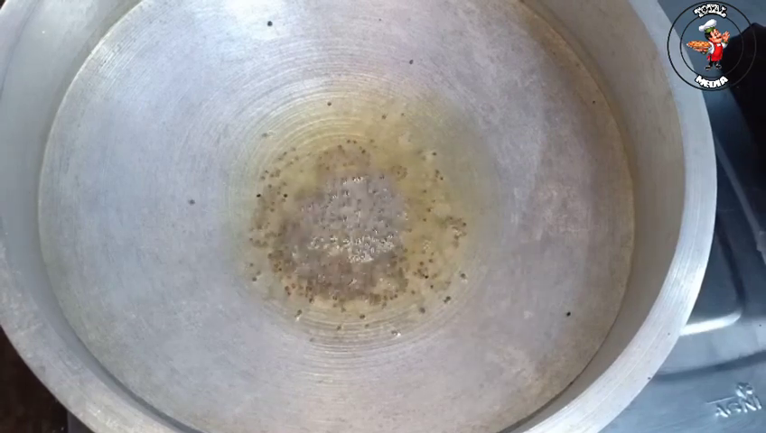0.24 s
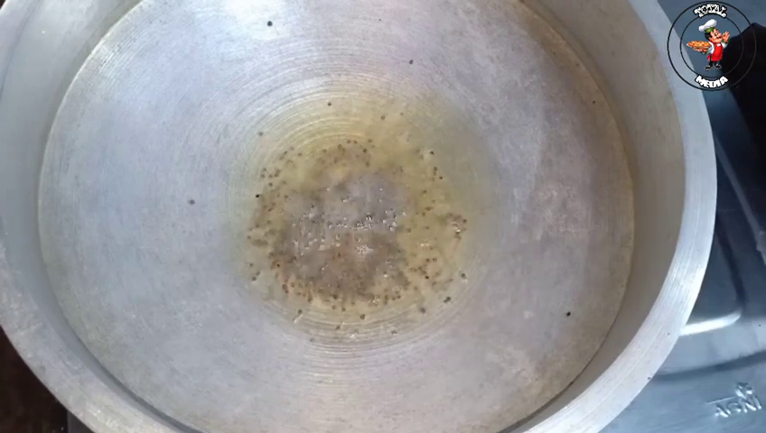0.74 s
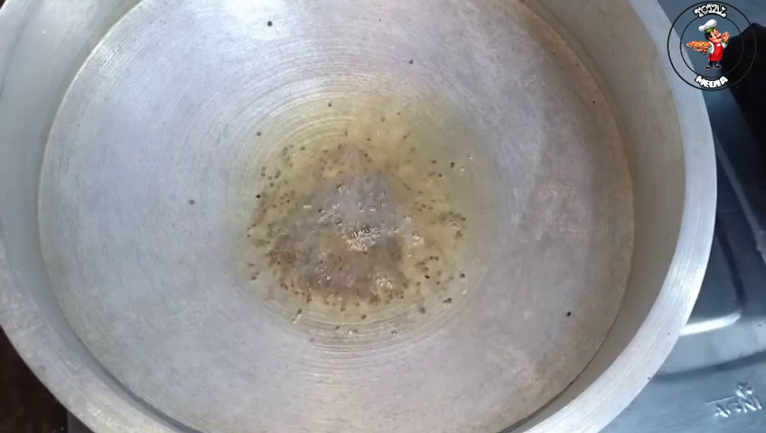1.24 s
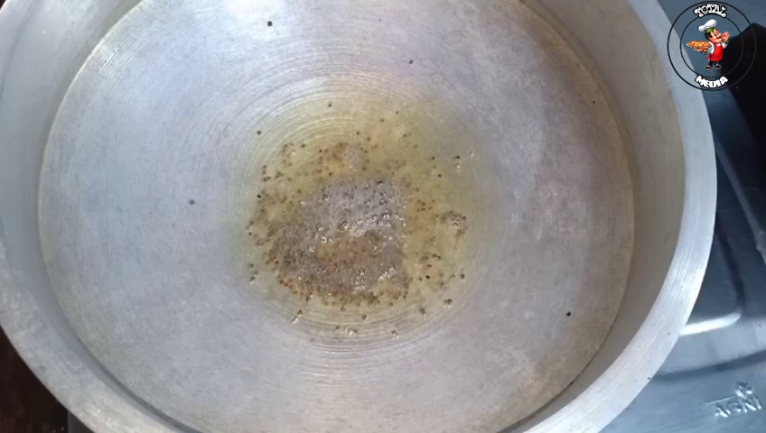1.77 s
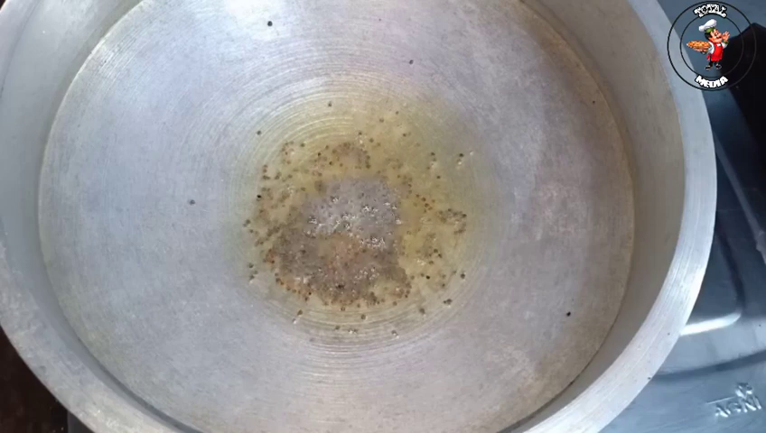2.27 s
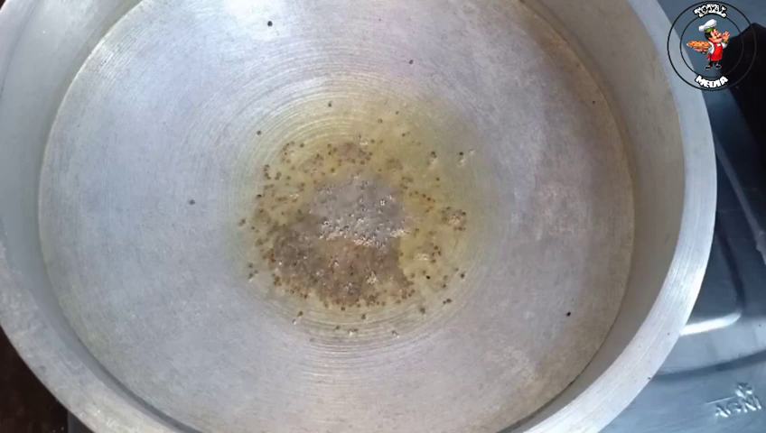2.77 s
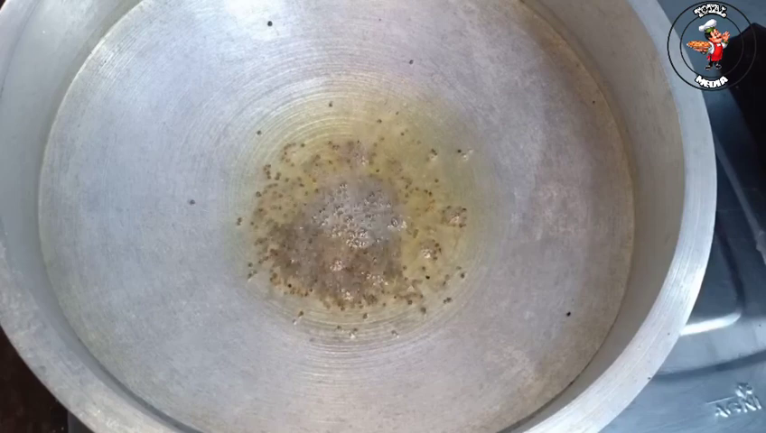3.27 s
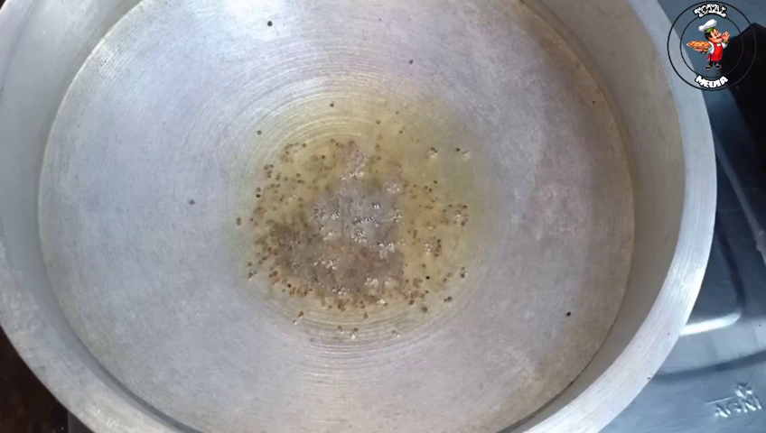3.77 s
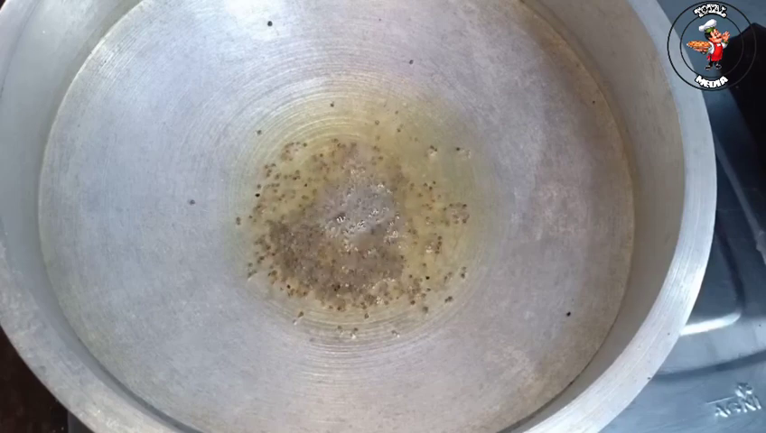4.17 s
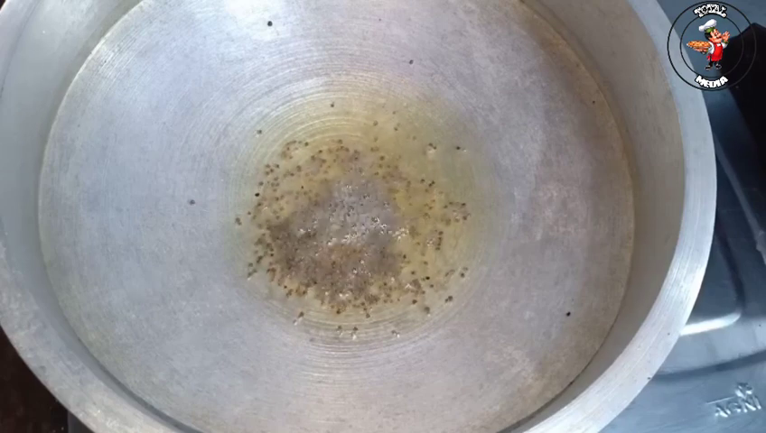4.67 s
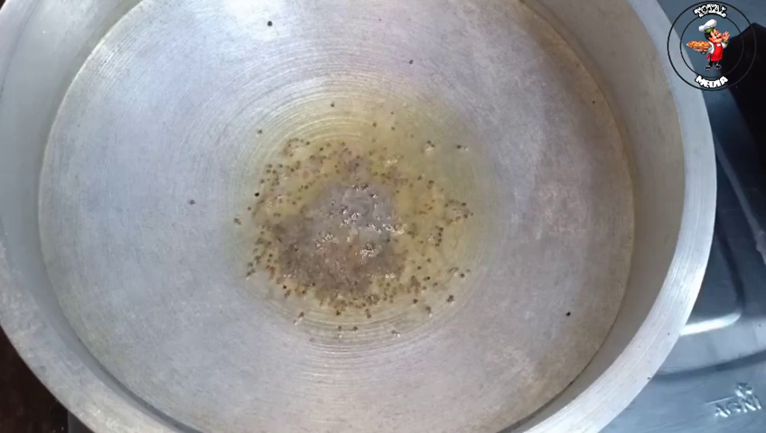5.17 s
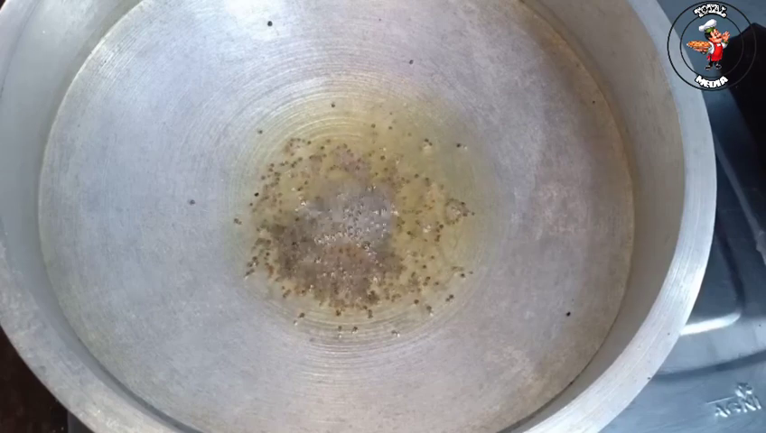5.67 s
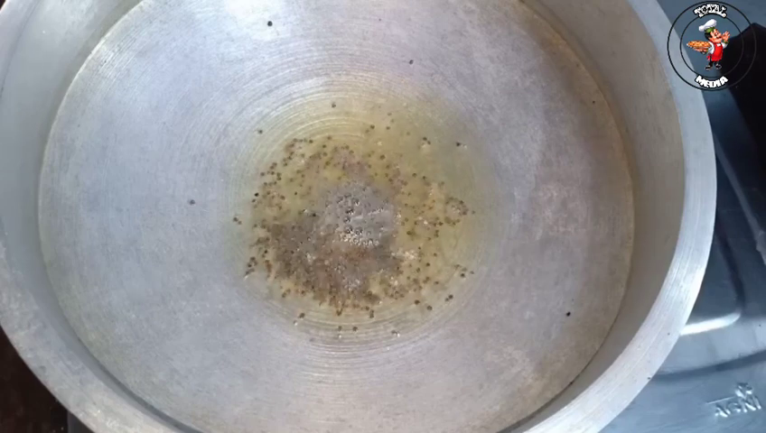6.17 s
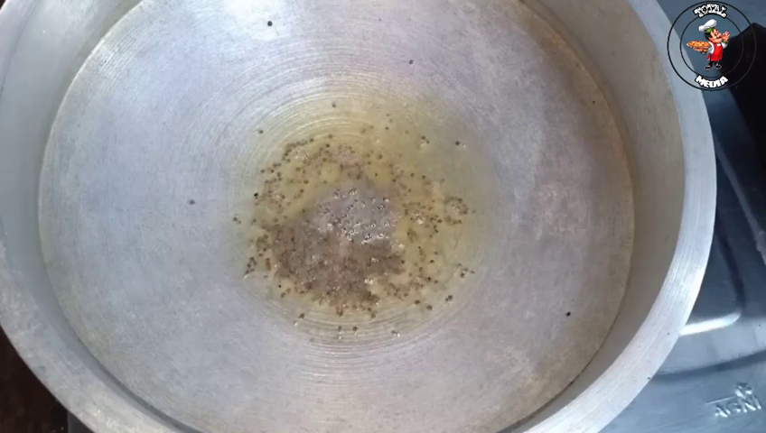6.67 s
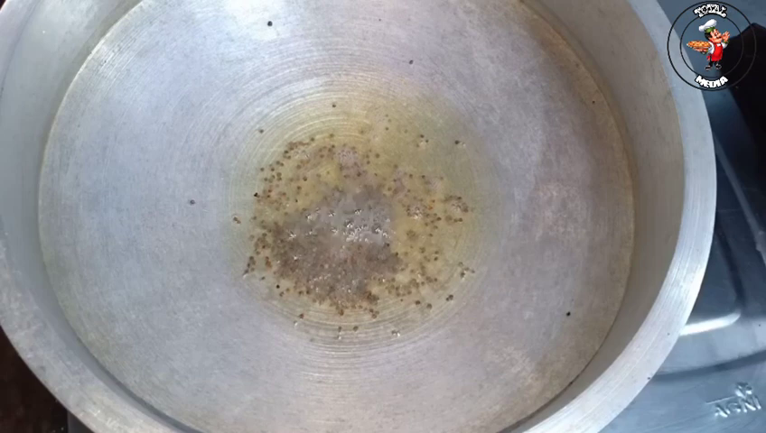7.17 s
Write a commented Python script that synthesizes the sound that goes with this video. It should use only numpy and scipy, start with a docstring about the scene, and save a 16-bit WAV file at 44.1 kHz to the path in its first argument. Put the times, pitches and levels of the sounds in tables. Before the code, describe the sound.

From the very start, seeds burst rapidly in hot oil in a deep heavy metal pan, close under a stereo microphone. Each burst is a very short, pitched, hollow pop with a bright crack, reflecting off the walls and ringing the metal briefly; the strongest flatten and distort. Droplets splutter in clusters after pops, above a thin fine sizzle. The first 1.9 s are densest, with a low puff of air mainly left at 0.9 s and bright steam spits near 0.9 and 1.5 s. A short gap follows around 2.0 s. Dull knocks cluster at 2.5-2.7 s, with fainter ones at 4.05-4.15 s. Popping is busy again around 3.0-3.8 s, then looser, with isolated loud pops and short hisses until 7.0 s; only weak pops remain to 7.4 s. A quiet low room rush and wavering hum continue underneath; one low drone fades by 3.8 s, another swells near 5.6 s and eases.

```python
"""Seeds bursting in hot oil

Small seeds burst one after another in a deep, heavy metal pan, close under a stereo microphone.
Each burst is a short pitched pop with a crack; it bounces off the walls, rings the pan, and the loudest overload.
Droplets splutter in their wake, bubbles sizzle and some jets of steam hiss; there are dull knocks and one air puff.
Behind lie a low room rush, a faint wavering hum and two drones, one dying away and one swelling then easing."""
import sys
import numpy as np
from scipy import signal
from scipy.fft import rfft, irfft
from scipy.io import wavfile

SR = 44100
rng = np.random.default_rng(int(sys.argv[2]) if len(sys.argv) > 2 else 0)


def transcribe(u):
    """Save the signal u as a 16-bit wav file named by the first command-line argument.

    u: samples, shape (n,) or (channels, n), limited to [-1, 1]; the rate is SR.
    q: integer samples, one column per channel.
    """
    v = np.clip(np.atleast_2d(u).T, -1, 1)
    q = np.round(v * 32767).astype(np.int16)
    wavfile.write(sys.argv[1], SR, q)


N = 327663

# bursting seeds, one a row: start_s, pop_db, pitch_hz, crack_db (strengths before colour and pan)
SEED_BURSTS = [(0.0085, 33.5, 2390, 13), (0.0235, 19, 2500, -2.0), (0.0557, 19, 2000.0, 2),
               (0.1192, 23, 2410, 10.5), (0.1427, 37.5, 2355, 6), (0.1909, 25, 1450, 18.5),
               (0.2177, 27.5, 2200, 17.5), (0.2635, 21.5, 4460, 11), (0.2799, 21.5, 2100, -9),
               (0.3117, 8, 2800.0, 17.0), (0.3253, 30.5, 2310, 9), (0.3577, 17.5, 2930.0, 9),
               (0.3792, 26.5, 1920, -13), (0.4521, 27.5, 2280.0, 2), (0.487, 20, 2670.0, 7.5),
               (0.5262, 18, 5400, 13.5), (0.5752, 22.5, 2680.0, -8.0), (0.5968, 34.5, 2340, 19),
               (0.6632, 22, 1430, 8.0), (0.6907, 31.0, 2190, 14.5), (0.7883, 22.5, 2480, 7.5),
               (0.8207, 21, 2050, 3), (0.8995, 21.5, 2350, -10), (0.9091, 16, 6100, 15.0),
               (0.9215, 20.5, 1910.0, -5), (0.985, 21.5, 2010, 12.5), (1.004, 9, 2400.0, 6),
               (1.032, 35, 2280.0, 13.5), (1.0611, 28.5, 2200, 20), (1.0994, 37, 2290, 11.5),
               (1.1289, 11, 1740.0, 10.0), (1.2096, 29, 2460, 7.5), (1.2593, 25, 1850.0, 7.5),
               (1.3008, 1, 3240.0, 11), (1.32, 23, 1700, -8.0), (1.3606, 20.5, 1890, -11),
               (1.365, 29, 2130, -7.0), (1.4622, 23.5, 1730, 2), (1.4749, 20.5, 7800, 12.0),
               (1.5396, 27, 3240, 2), (1.5615, 25.5, 1780, 9.5), (1.6109, 35, 2320, 11.0),
               (1.6252, 19.5, 5270, 14.0), (1.658, 16.0, 4400, 12.5), (1.7364, 27, 1700.0, 5),
               (1.7614, 29, 2400, 15.0), (1.7907, 35.5, 2340, 13.5), (1.8673, 25, 2090, 7),
               (1.9467, 19, 2030, 6), (2.1835, 23, 2380, -1), (2.2064, 27.5, 2270.0, 10),
               (2.2442, 26.5, 2020, -14), (2.2946, 27.5, 2010.0, 7), (2.3119, 28.0, 2450, 9),
               (2.4656, 24.5, 3130.0, 15.5), (2.5359, 28.5, 5760, 18), (2.6078, 22, 1840, 14.5),
               (2.6299, 36, 2290, 10), (2.685, 27.5, 2200, 18.5), (2.782, 26.0, 1870, -1.0),
               (2.7883, 33.5, 2220, 12.5), (2.8386, 26, 1910.0, 8), (2.9027, 17.5, 2280, -2.5),
               (2.9726, 15, 2240.0, 6), (2.9983, 29.5, 2450, 16.5), (3.024, 39.5, 2290, 12),
               (3.05, 22, 2500.0, 4), (3.0632, 20, 1870.0, 5), (3.0851, 24, 2180, 17.5),
               (3.116, 20.5, 7460, 11), (3.1369, 13.5, 7560.0, 8), (3.2544, 16.5, 1820, 2.5),
               (3.2876, 22, 2510, 9), (3.3968, 21, 1550, 3.0), (3.404, 29, 1940, 12),
               (3.419, 18.5, 3200.0, 8), (3.4505, 21.5, 1750, 4), (3.4931, 32.5, 2300, 15.5),
               (3.5308, 32.5, 2200, 8), (3.553, 21.5, 2000.0, -3), (3.5954, 26.5, 1810, 13),
               (3.7436, 32.5, 2240, 16.5), (3.7604, 36, 2440, 17), (3.8902, 20, 1650, 9.5),
               (3.9781, 23, 2520, -1), (3.998, 17, 1680, -5.0), (4.0312, 33.5, 1920, 13),
               (4.1002, 3, 4510.0, 11.5), (4.228, 28, 2160, 16.5), (4.2726, 18, 1980, 0.0),
               (4.3122, 32.5, 2390.0, 9), (4.4265, 19, 2240, 14), (4.5213, 37, 2190, 3),
               (4.5463, 26, 1950, 16.5), (4.6283, 21.0, 4180.0, 19.0), (4.6902, 20.5, 2050, 5),
               (4.709, 21.5, 2500, 8), (4.7237, 16.5, 2020, 8.5), (4.7309, 27, 2120, 3),
               (4.9389, 17, 5200, -12), (4.9856, 24, 2040, -1.0), (5.0201, 31.5, 2220, 6.0),
               (5.1238, 16, 1750, 16.5), (5.1377, 31, 2010, -4), (5.2037, 22.5, 2480, 6.5),
               (5.2275, 24.5, 2060, 8.0), (5.3158, 21.5, 2140, 5.5), (5.3435, 6, 7640.0, 5.5),
               (5.4167, 23, 1800.0, -11), (5.4497, 16.0, 1920, -13), (5.5821, 28.5, 2060, 7.5),
               (5.6586, 37.5, 2390, 20.5), (5.6831, 28, 2660, -5), (5.7228, 25.5, 1790.0, 10.5),
               (5.7485, 24, 2130, 7), (5.865, 26, 2900, 5), (6.0081, 32.5, 2250.0, -1.0),
               (6.0701, 19, 3840.0, 9), (6.0805, 22, 3200, 14), (6.0929, 29, 1570, 4),
               (6.1428, 25.5, 2180, 0), (6.2181, 17.5, 2800, 9), (6.363, 34.5, 2200.0, 1.0),
               (6.3889, 25.5, 1600, 6), (6.4309, 24.5, 2140, 9), (6.4652, 18, 1800, 1),
               (6.5844, 30.5, 2330.0, 8.5), (6.6989, 23, 2680, 11.0), (6.765, 25.0, 2180.0, 5.5),
               (6.8387, 33.5, 2280.0, 17.0), (6.9541, 36.0, 2180, 14.0), (7.1635, 15, 6000, 4),
               (7.2371, 15.5, 3010.0, 7.5), (7.3305, 12.5, 5140, 13), (7.3683, 18.5, 1720.0, 2.0),
               (7.4126, 3, 3840, -1.0)]
# relative colour of a burst as it leaves the pan: frequency_hz, gain_db
BURST_COLOUR = [(40, -21), (200, -19.5), (500, -9), (850, -4.5), (1150, -8), (1600, -2), (2300, -4.5),
                (3100, 1.5), (3500, -6), (4100, -3.5), (5200, 3.5), (6100, -0.5), (7100, -11.5),
                (9000, -19.5), (15000, -24)]
EDGE_HZ = 15900  # upper band limit


def seeds(level_db=-2, size=16384, spot_count=36):
    """A husk splits with a broadband crack, and the escaping steam rings for a few cycles."""
    hz, out = bins(size), np.zeros((2, N))
    colour = causal(amp(read(BURST_COLOUR, hz) + level_db))
    # the bursts take turns over a limited set of spots in the oil
    spots = [pan_path() * tear() * colour for _ in range(spot_count)]
    for k, (start_s, pop_db, pitch_hz, crack_db) in enumerate(SEED_BURSTS):
        spectrum = burst(hz, pop_db, pitch_hz, crack_db) * spots[k % spot_count]
        add(out, start_s, irfft(spectrum))
    return out


def burst(hz, pop_db, pitch_hz, crack_db):
    """Spectrum of one seed: a flat crack and a steam resonance, sharper when strong or in tune with the pan's air."""
    cavity_hz, cavity_q, cavity_boost = 2280, 8.6, 2.48  # boost: extra Q, in times, for a pop in tune
    base_q, ordinary_db, q_db_per_db = 2.9, 27.5, 0.09
    in_tune = abs(bell(pitch_hz, cavity_hz, cavity_q)) ** 2
    strength_factor = amp(q_db_per_db * (pop_db - ordinary_db))
    q = base_q * strength_factor * (1 + cavity_boost * in_tune)
    pop = amp(pop_db) * abs(bell(hz, pitch_hz, q))
    return causal(np.hypot(pop, amp(crack_db)))


def tear(tear_s=0.0011, first=3.2, depth=0.74, size=16384):
    """Spectrum of a husk giving way: a first snap and a quick run of smaller ones, with no strong colour."""
    t = np.arange(size) / SR
    snaps = rng.standard_normal(size) * np.exp(-t / tear_s) + first * (t == 0)
    spectrum = rfft(snaps / np.linalg.norm(snaps))
    # even out the peaks of the spectrum; a larger depth leaves more of them
    spectrum = spectrum / causal(np.hypot(abs(spectrum), depth))
    return spectrum / np.sqrt(np.mean(abs(spectrum) ** 2))


def pan_path(wall_db=-1, wall_t60_s=0.043, ring_db=-2, spread_db=1.7, detune=0.00905,
             lag_s=0.000093, side_db=1.23, right_db=0.6, shared=0.14, size=16384):
    """Spectrum from one spot in the oil to both microphones: direct, off the walls and through the pan's modes."""
    # ringing of the pan and the air in it: frequency_hz, level_db (before ring_db and spread), t60_s
    modes = [(1526, -2, 0.062), (1520, -20, 0.28), (1790, 7.5, 0.22), (1800, 8.5, 0.15), (1866.6, 12, 0.09),
             (1903, 11, 0.16), (2007, 7, 0.38), (2200, -16, 0.11), (2240, 0.5, 0.07), (2308, 12.5, 0.054),
             (2270, 8.5, 0.061), (2298, 12, 0.16), (2440, 2, 0.35), (2670, 6.5, 0.29), (2965, 5, 0.044),
             (3193, 12.5, 0.13), (3784, 15.5, 0.056), (5500, -13, 0.11)]
    hz, t = bins(size), np.arange(size) / SR
    # the left port is farther away
    lag = np.exp(-2j * np.pi * hz * lag_s * rng.uniform(0.64, 1.574))

    # sparse wall reflections: one set common to both ports, one set for each
    reflected = rng.random((3, size)) < 0.12
    decay = amp(-60 * t / wall_t60_s) * (t > 0.0003)
    scatter = rng.standard_normal((3, size)) * reflected * decay
    both, *own = rfft(scatter / np.linalg.norm(scatter, axis=1, keepdims=True))
    walls = amp(wall_db) * (np.sqrt(shared) * both + np.sqrt(1 - shared) * np.array(own))

    # the modes come in close clusters, and each spot drives other members of them by other amounts
    ring = 0
    for mode_hz, level_db, t60_s in modes:
        drive, shift = rng.standard_normal(2)
        gain = amp(level_db + ring_db + spread_db * drive)
        ring = ring + gain * bell(hz, mode_hz * (1 + detune * shift), mode_hz * t60_s / 2.28)

    half_side_db = (right_db + side_db * rng.standard_normal()) / 2
    ports = np.array([lag, np.ones_like(lag)]) * amp([[-half_side_db], [half_side_db]])
    return (1 + walls + ring) * ports


def splutter(level_db=-10, per_s=70, spread_db=1.5, low_hz=1800, high_hz=6500, q=3, size=8192, bands=8):
    """Small droplets pop in the wake of the bursts, as often as the oil is stirred up."""
    hz, out = bins(size), np.zeros((2, N))
    chance = unrest() * per_s / bands / SR
    colour = causal(amp(read(BURST_COLOUR, hz) + level_db))
    for centre_hz in np.geomspace(low_hz, high_hz, bands):
        strength = amp(spread_db * np.minimum(rng.exponential(1, N), 4))
        pops = (rng.random(N) < chance) * strength
        droplet = irfft(bell(hz, centre_hz, q) * colour * pan_path()[:, ::2])  # every 2nd bin fits the size
        out += signal.oaconvolve(pops[None], droplet, axes=1)[:, :N]
    return out


def unrest(settle_s=0.09):
    """How stirred up the oil is, 1 on average: every burst adds to it, and it settles again."""
    t = np.arange(N) / SR
    kicks = np.histogram([row[0] for row in SEED_BURSTS], N, (0, t[-1]))[0]
    stir = signal.lfilter([1], [1, -np.exp(-1 / (settle_s * SR))], kicks)
    return stir / stir.mean()


def sizzle(level_db=-43, per_s=700, spread_db=1.0, low_hz=2000, high_hz=7000, q=8.8,
           follow=0.49, size=4096, bands=14):
    """Tiny steam bubbles of many sizes break at the surface, more of them when the oil is stirred up."""
    hz, out = bins(size), np.zeros((2, N))
    chance = per_s / bands / SR * (1 + follow * (unrest() - 1))
    colour = causal(amp(read(BURST_COLOUR, hz)))
    for centre_hz in np.geomspace(low_hz, high_hz, bands):
        strength = amp(spread_db * np.minimum(rng.exponential(1, N), 5))
        breaks = (rng.random(N) < chance) * strength
        tick = irfft(bell(hz, centre_hz, q) * colour * pan_path()[:, ::4])  # every 4th bin fits the size
        out += signal.oaconvolve(breaks[None], tick, axes=1)[:, :N]
    return amp(level_db) * evened(out)


def spits(low_hz=8500, treble_db_per_octave=3, rise_s=0.00078, t60_s=0.02, extra_room_db=8, size=4096):
    """A jet of steam tears through the oil: a bright hiss of a few milliseconds that the kitchen throws back."""
    # hissing spits of steam and oil: start_s, level_db (before the envelope)
    jets = [(0.6635, -19), (0.908, -10.5), (1.474, -16.5), (1.795, -21.5), (2.5344, -14.5), (3.117, -14),
            (3.137, -19), (3.611, -27), (3.786, -21.5), (4.334, -23), (4.549, -27), (4.626, -16),
            (5.3428, -16.5), (6.078, -18), (6.433, -19.5), (6.837, -18)]
    hz, t, out = bins(size), np.arange(size) / SR, np.zeros((2, N))
    tilt = amp(treble_db_per_octave * np.log2((hz + 1) / low_hz))
    colour = tilt / np.hypot(1, (low_hz / (hz + 1)) ** 3) * (hz < EDGE_HZ)
    for start_s, level_db in jets:
        hiss = evened(irfft(colour * rfft(rng.standard_normal((2, size)))))
        envelope = amp(level_db - 60 * t / t60_s) * (1 - np.exp(-t / rise_s))
        add(out, start_s, hiss * envelope)
    return out + amp(extra_room_db) * room(out)


def knocks(q=1.7, rise_s=0.0019, width=0.39, top_hz=1250, size=16384):
    """Dull, quickly damped bumps: a dense cluster of low modes each."""
    # knocks and bumps: start_s, level_db (before the rise), centre_hz, t60_s
    bumps = [(2.511, -17, 400, 0.087), (2.517, -8.5, 535, 0.12), (2.545, -22, 690, .14),
             (2.567, -13, 446, 0.18), (2.61, -22, 427, 0.45), (2.687, -19, 340, 0.35),
             (2.725, -27, 122, .14), (4.056, -21, 530, 0.18), (4.098, -23, 430, 0.18),
             (4.145, -31, 320, 0.27)]
    hz, t, out = bins(size), np.arange(size) / SR, np.zeros((2, N))
    for start_s, level_db, centre_hz, t60_s in bumps:
        low_cut = np.hypot(1, (0.5 * centre_hz / (hz + 1)) ** 3)
        body = abs(bell(hz, centre_hz, q)) / (1 + (hz / top_hz) ** 4) / low_cut
        rattle = irfft(body * np.exp(2j * np.pi * rng.random((2, len(hz)))))
        envelope = amp(level_db - 60 * t / t60_s) * (1 - np.exp(-t / rise_s))
        envelope_rms = np.sqrt(np.mean(envelope ** 2))
        mid, side = [evened(part * envelope) * envelope_rms for part in rattle]
        add(out, start_s, np.array([mid + width * side, mid - width * side]))
    return out


def puff(start_s=0.9088, decay_s=0.0033, level_db=-7, swing_hz=230, right_db=-5, size=2048):
    """One push of air on the microphone, mostly on the left port, that swings back as it dies."""
    t, out = np.arange(size) / SR, np.zeros((2, N))
    # the swing starts at swing_hz and slows down as it dies
    turns = swing_hz * decay_s * np.log1p(t / decay_s)
    push = np.sin(2 * np.pi * turns + np.pi / 4) * np.exp(-t / decay_s)
    add(out, start_s, amp([[level_db], [level_db + right_db]]) * push)
    return out


def room(x, wet_db=-13, build_s=0.0092, size=22050):
    """The kitchen's diffuse tail, each band dying at its own speed."""
    # kitchen reverberation: frequency_hz, t60_s
    decay_times = [(200, 0.053), (1000, 0.24), (2300, 0.23), (5500, 0.26), (9000, 0.24), (15000, 0.12)]
    hz, t, grains = signal.stft(rng.standard_normal((2, size)), SR, nperseg=256)
    decay = amp(-60 * t / read(decay_times, hz)[:, None])
    build = 1 - np.exp(-t / build_s)
    tail = signal.istft(grains * decay * build, SR, nperseg=256)[1]
    return amp(wet_db) * signal.fftconvolve(x, tail / np.linalg.norm(tail[0]), axes=1)[:, :N]


def kitchen(level_db=-39, swell_db=1):
    """Low rush of the room, gently swelling, with a faint wavering hum and two slow drones."""
    # relative spectrum of the rush: frequency_hz, density_db (per Hz)
    rush_colour = [(20, -17), (50, -11), (85, -5.5), (125, 3.5), (210, -6.5), (300, -0.5), (450, -1),
                   (680, 3), (850, -2), (1200, -10), (2300, -5), (4000, -19), (8000, -20.5), (15500, -19)]
    # left-right likeness of the rush: frequency_hz, likeness (0-1)
    likeness = [(60, 1), (130, 0.85), (290, 0.73), (640, 0.33), (1400, 0), (3000, 0)]
    # faint wavering hum: pitch_hz, level_db
    hum_tones = [(271, -56), (409, -54.5), (483, -55.5), (538, -59.5), (678, -57)]
    # drone levels over time: time_s, lower_db, upper_db
    drone_levels = [(0, -53.5, -53), (3.2, -61, -56.5), (3.8, -73, -57), (5.2, -75, -57), (5.6, -75, -49.5),
                    (6.8, -75, -51), (7.4, -75, -54)]
    # pitches of the lower and upper drone: pitch_hz
    drone_pitches = (74.4, 156)

    hz, t = np.fft.rfftfreq(N, 1 / SR), np.arange(N) / SR
    left, other = rfft(rng.standard_normal((2, N)))
    same = np.clip(read(likeness, hz), -1, 1)
    right = same * left + np.sqrt(1 - same ** 2) * other
    rush = irfft(np.array([left, right]) * amp(read(rush_colour, hz)), N)
    swell = amp(swell_db * drift(12.0))

    hum = sum(amp(tone_db) * waver(pitch_hz) for pitch_hz, tone_db in hum_tones)
    times, *levels = np.transpose(drone_levels)
    drone = sum(amp(np.interp(t, times, curve_db)) * waver(pitch_hz)
                for pitch_hz, curve_db in zip(drone_pitches, levels))
    return amp(level_db) * evened(rush) * swell + hum + drone


def waver(hz, waver_hz=3.605):
    """A tone of unit rms that wanders in pitch and strength."""
    turns = np.cumsum(hz + waver_hz * drift(25)) / SR
    return evened((1 + 0.5 * drift(6)) * np.sin(2 * np.pi * turns))


def drift(rate_hz):
    """Slow random wander with an rms of one."""
    knots = rng.standard_normal(4096)
    return evened(np.interp(np.arange(N) / SR * rate_hz, np.arange(len(knots)), knots))


def amp(db):
    """Decibels to gain."""
    return 10 ** (np.asarray(db) / 20)


def evened(x):
    """Scales to an rms of one."""
    return x / np.sqrt(np.mean(x ** 2) + 1e-20)


def read(points, hz):
    """Reads a spectrum table on a log-frequency axis."""
    table_hz, value = np.transpose(points)
    return np.interp(np.log(hz + 1), np.log(table_hz), value)


def add(mix, start_s, sound):
    """Mixes a sound in at its start time."""
    part = mix[..., max(round(start_s * SR), 0):][..., :sound.shape[-1]]
    part += sound[..., :part.shape[-1]]


def bins(size):
    """Frequencies of a spectrum of that many samples."""
    return np.arange(size // 2 + 1) * SR / size


def bell(hz, centre_hz, q):
    """Complex response of one resonance."""
    return 1 / (1 + 1j * q * ((hz + 1) / centre_hz - centre_hz / (hz + 1)))


def causal(gain):
    """The minimum-phase response with this gain: it starts sharply and then dies away."""
    log_gain = np.log(np.maximum(np.r_[gain, gain[-2:0:-1]], 1e-5))
    return np.exp(np.conj(signal.hilbert(log_gain)))[:len(gain)]


def scene():
    """Pan and knocks echo in the kitchen; spits bring their own echo, the puff and background have none."""
    near = seeds() + splutter() + sizzle() + knocks()
    return near + room(near) + spits() + puff() + kitchen()


def record(dry, ceiling=1.0, knee=6, low_hz=28):
    """The loudest pops flatten against the ceiling; then the band limits."""
    clipped = dry / (1 + abs(dry / ceiling) ** knee) ** (1 / knee)
    high_pass = signal.butter(2, low_hz, "high", fs=SR, output="sos")
    low_pass = signal.firwin(255, EDGE_HZ, window=("kaiser", 8), fs=SR)
    return signal.oaconvolve(signal.sosfilt(high_pass, clipped), low_pass[None], "same")


dry = scene()
out = record(dry)
transcribe(out)
```